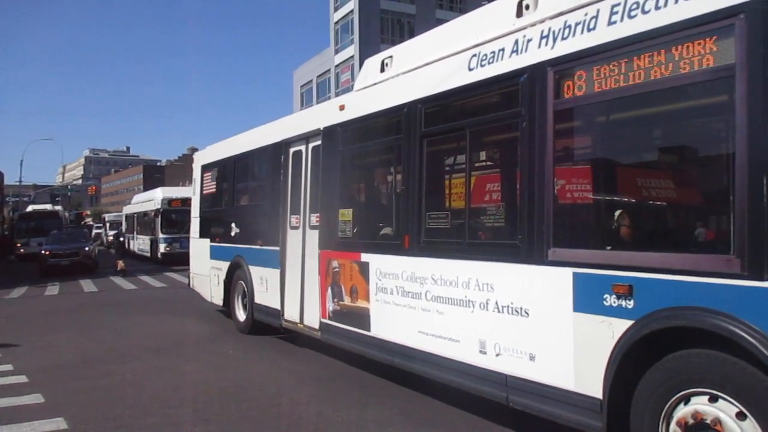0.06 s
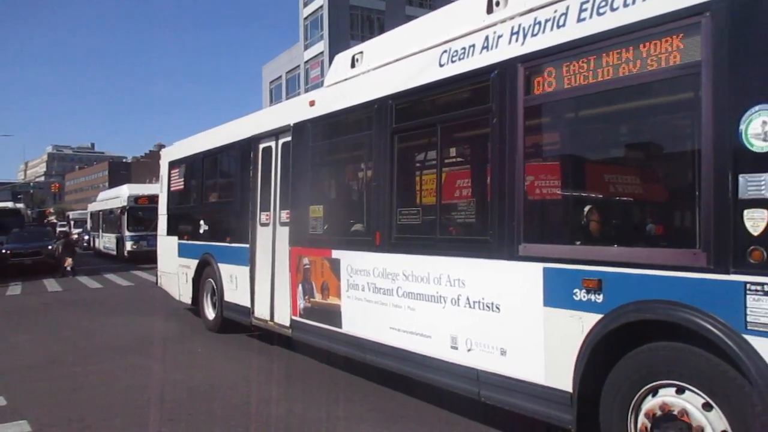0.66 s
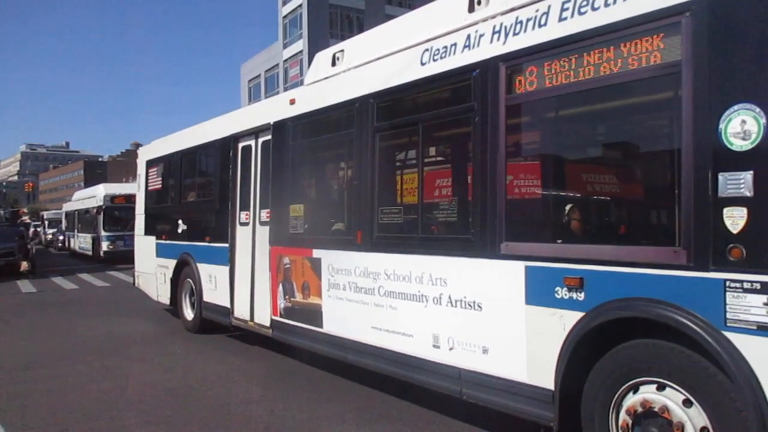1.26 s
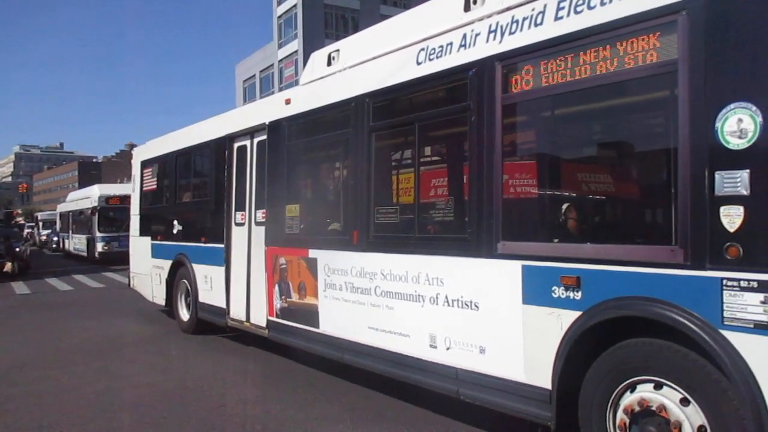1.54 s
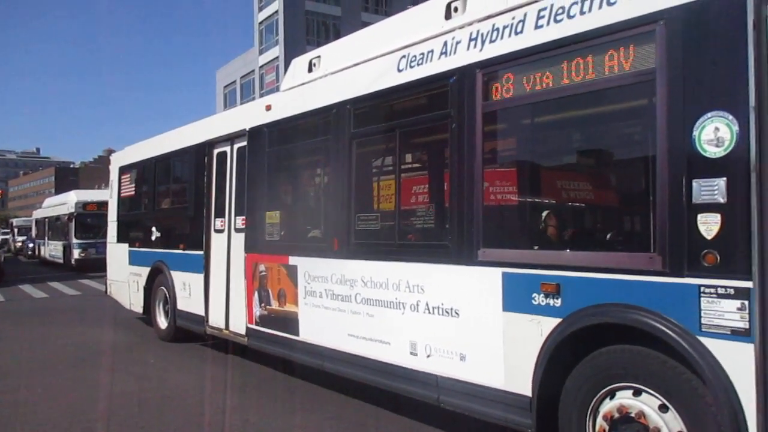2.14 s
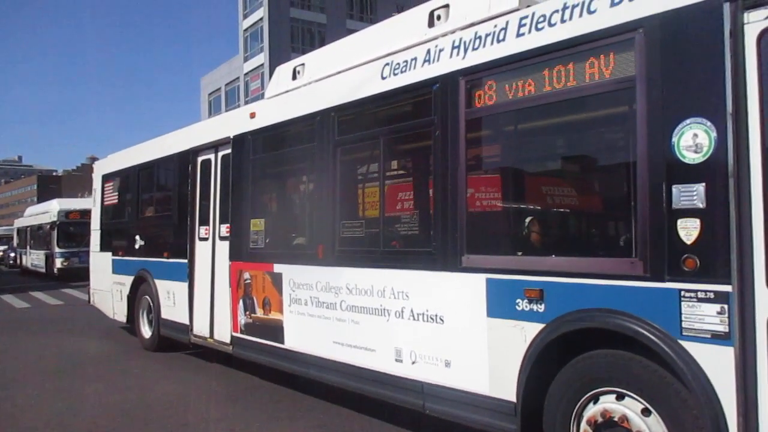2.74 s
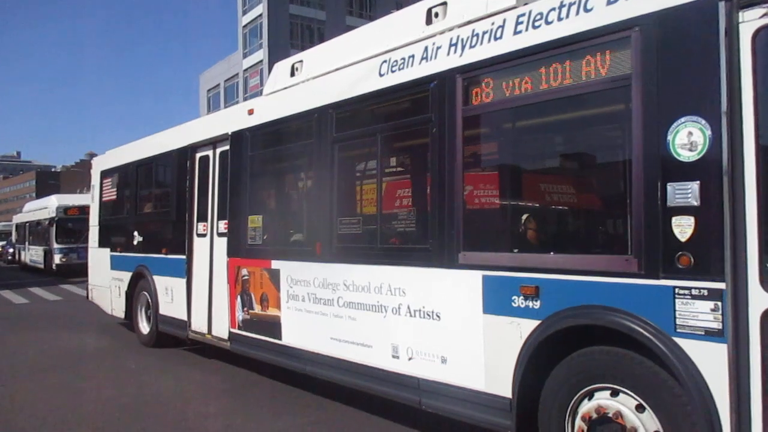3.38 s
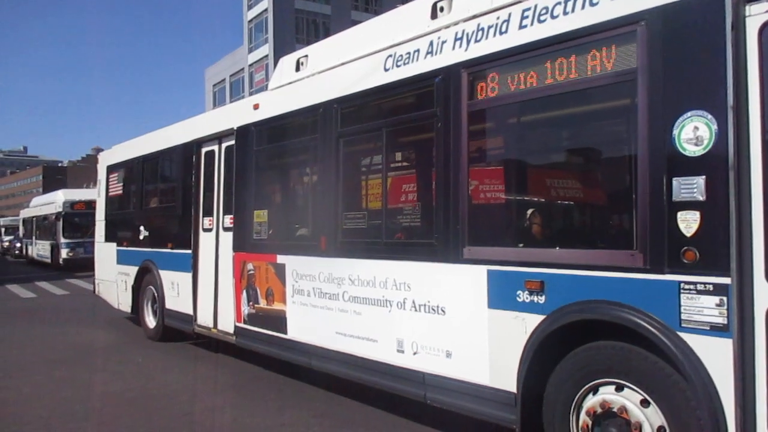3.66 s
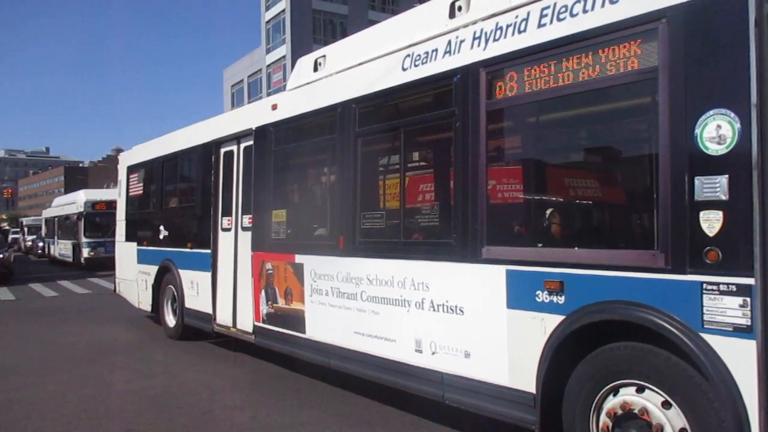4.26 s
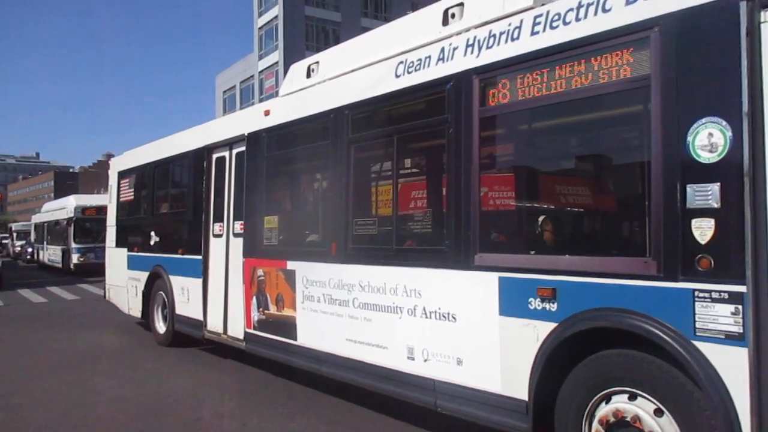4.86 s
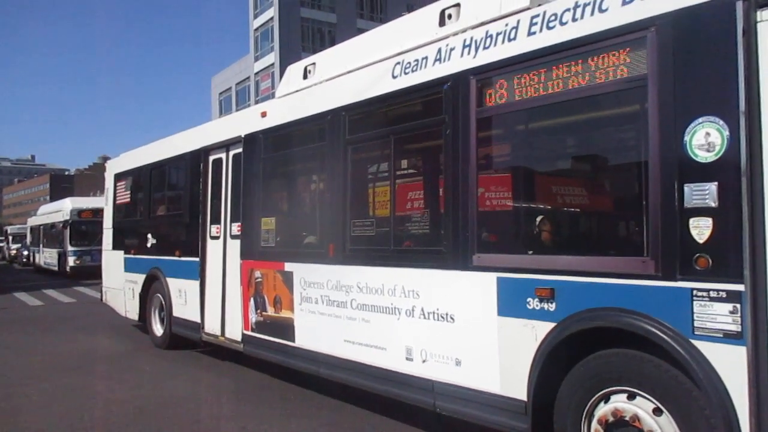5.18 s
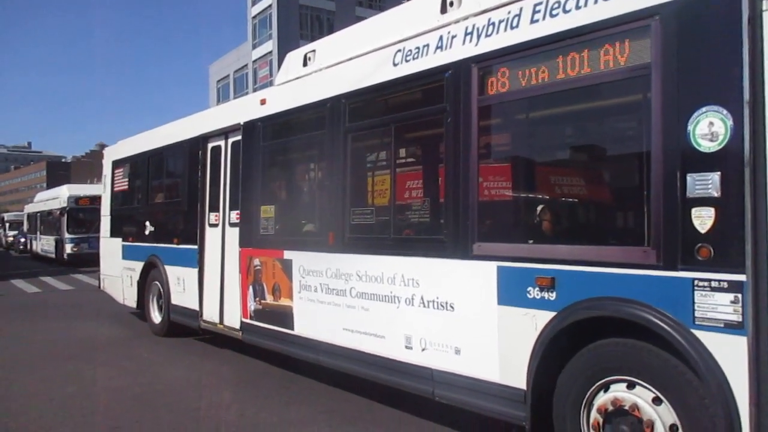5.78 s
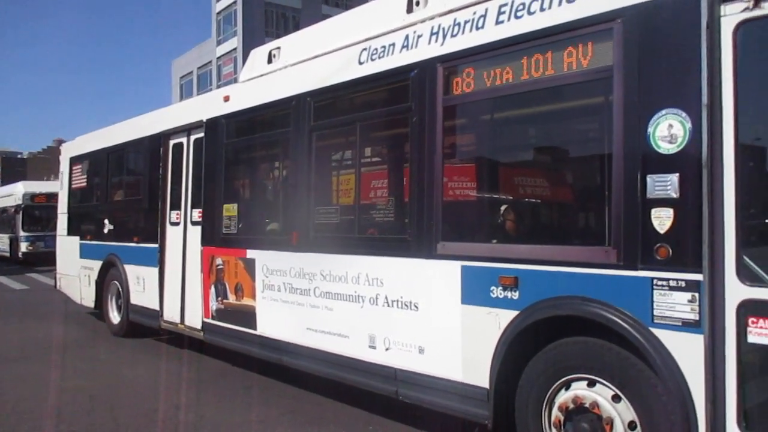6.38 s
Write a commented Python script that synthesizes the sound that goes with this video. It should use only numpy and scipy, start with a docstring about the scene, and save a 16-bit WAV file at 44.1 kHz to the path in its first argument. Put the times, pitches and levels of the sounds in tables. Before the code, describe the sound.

A hybrid city bus idles very close by in street traffic. Its diesel engine gives a low, slightly wavering drone with light clatter for the whole six and a half seconds, blended with a steady rush of fans and street noise. A short squeak opens the sound, and dull body thumps land at about 0.2 and 1 second. A few tiny ticks are scattered throughout. From about 1.5 seconds the brakes give thin, very high squeals on and off, clearest between 2.3 and 3 seconds. A faint, high electric whine swells just after 2 seconds and again near 3.5. A third dull thump comes at 4.2 seconds, followed by a few brief squeaks up to about 4.8. From 5.1 seconds the longest thin squeal flutters almost to the end, with one more squeak near 5.9, while the engine keeps droning.

```python
"""A diesel-electric city bus at arm's length in street traffic.
Throughout, its six-cylinder engine idles near 1000 rpm, droning and clattering under fan and street noise.
It opens with a squeak and two dull body thumps; sparse ticks follow. From 1.5 s the brakes squeal thinly,
on and off, and the inverter whine swells after 2 s and again near 3.5 s. A third thump comes at 4.2 s,
then a few squeaks and, from 5.1 s, the longest squeal."""
import sys
import numpy as np
from scipy import signal
from scipy.fft import rfft, irfft
from scipy.io import wavfile

SR = 44100
rng = np.random.default_rng(int(sys.argv[2]) if len(sys.argv) > 2 else 0)


def wrap_up_sound(samples):
    """Save the sound to the file named by the first command line argument, as 16-bit audio."""
    columns = np.atleast_2d(samples).T
    # keep every value between -1 and 1, then stretch to whole-number steps
    tamed = np.clip(columns, -1, 1)
    steps = np.round(tamed * 32767).astype(np.int16)
    wavfile.write(sys.argv[1], SR, steps)


N = 287857
CYLINDERS = 6

# Street and fan noise. Each row: time in seconds, then rumble, roar and hiss in relative dB.
NOISE_LEVELS = [(0.0, -16, -25, -54), (0.05, -17.5, -24, -52.5), (0.22, -15.5, -23, -48),
                (0.29, -21, -24.5, -54), (0.31, -17, -26.5, -49), (0.43, -19.5, -25.5, -51.5),
                (0.5, -16.5, -26, -52), (0.58, -16.5, -25.5, -54.5), (0.65, -15.5, -25.5, -54),
                (0.94, -18, -24, -52.5), (0.96, -13, -25, -53), (1.01, -15.5, -26, -57),
                (1.08, -14.5, -27, -52), (1.14, -17.5, -25.5, -54.5), (1.26, -14, -25.5, -52.5),
                (1.3, -16.5, -26, -54), (1.37, -14.5, -24.5, -54), (1.43, -20, -26, -53),
                (1.44, -17, -24.5, -53), (1.55, -15, -26, -53), (1.86, -19.5, -25, -51.5),
                (1.93, -15, -23, -51), (1.99, -21, -24, -51), (2.04, -13, -24, -51), (2.07, -11, -23, -50),
                (2.2, -18, -25, -50.5), (2.24, -15, -23, -49), (2.27, -11.5, -27, -52),
                (2.29, -26, -25.5, -48), (2.31, -16, -25, -51), (2.35, -20, -24.5, -53),
                (2.4, -13.5, -25, -48.5), (2.44, -21, -24.5, -49.5), (2.56, -13.5, -24.5, -54),
                (2.63, -19, -24, -53), (2.72, -16, -26, -54), (2.76, -17, -26, -53),
                (3.32, -14.5, -23.5, -53), (3.34, -9.5, -21.5, -55), (3.37, -17, -24, -52),
                (3.54, -16.5, -25.5, -54), (3.57, -16, -21.5, -54), (3.64, -14.5, -25.5, -52),
                (3.74, -14, -23.5, -53), (4.06, -15.5, -24, -51), (4.13, -14.5, -26.5, -54),
                (4.2, -16, -24.5, -47.5), (4.24, -14.5, -25.5, -54), (4.28, -19.5, -27.5, -54),
                (4.49, -18, -28, -57), (4.51, -21, -26.5, -48.5), (4.6, -19, -27, -56),
                (5.61, -16, -22.5, -53), (5.68, -14.5, -22, -50), (5.7, -19, -25, -54.5),
                (5.94, -14, -24, -53), (6.12, -18, -26, -56.5), (6.19, -14, -26, -55),
                (6.3, -19, -26, -54.5), (6.37, -13, -26, -52), (6.39, -15, -25, -55),
                (6.48, -16, -24.5, -52.5)]
# Body boom and valve gear rasp. Each row: time in seconds, then boom and rasp in relative dB.
BOOM_RASP_LEVELS = [(0, -24, -41), (.6, -26.5, -43.5), (1.3, -20.5, -45), (1.75, -24, -44.5),
                    (2.05, -28.5, -38), (2.4, -30, -44.5), (3.0, -29.5, -44), (3.7, -26.5, -45),
                    (4.2, -28, -44), (4.35, -35, -48), (5.0, -28.5, -48), (5.5, -22.5, -48),
                    (6.0, -29, -49), (6.53, -37, -49)]


def from_db(db):
    """Decibels to gain."""
    return 10 ** (np.asarray(db) / 20)


def unit_rms(x):
    """Scale to unit rms."""
    return x / np.sqrt(np.mean(x ** 2) + 1e-20)


def seconds():
    """Time of every sample."""
    return np.arange(N) / SR


def curves(rows):
    """Each column after the time, interpolated to every sample."""
    time_s, *columns = np.transpose(rows)
    return [np.interp(seconds(), time_s, column) for column in columns]


def drift(rate_hz):
    """Unit-rms random wander, mostly below rate_hz."""
    hz = np.arange(N // 2 + 1) * SR / N
    return unit_rms(irfft(rfft(rng.standard_normal(N)) / (1 + (hz / rate_hz) ** 2), N))


def shaped_noise(spectrum):
    """Unit-rms noise with the given spectrum, rolling off beyond its ends."""
    hz = np.maximum(np.arange(N // 2 + 1) * SR / N, 1)
    points_hz, db = np.transpose(spectrum)
    skirts = np.minimum(hz / points_hz[0], 1) * np.minimum(points_hz[-1] / hz, 1)
    gain = from_db(np.interp(np.log(hz), np.log(points_hz), db)) * skirts ** 2
    return unit_rms(irfft(rfft(rng.standard_normal(N)) * gain, N))


def resonate(x, hz, width_hz):
    """Steep-sided resonance."""
    edges_hz = np.clip([hz - width_hz / 2, hz + width_hz / 2], 10, SR / 2 - 10)
    return signal.sosfilt(signal.butter(2, edges_hz, "band", fs=SR, output="sos"), x)


def band_noise(hz, width_hz, drive=1):
    """Unit-rms resonance fed by noise with the envelope drive."""
    return unit_rms(resonate(drive * rng.standard_normal(N), hz, width_hz))


def tone(turns, waver, rate_hz=2.76):
    """Unit-rms sine wavering in amplitude and phase."""
    angle = 2 * np.pi * turns
    in_phase = (1 + waver * drift(rate_hz)) * np.sin(angle)
    quadrature = waver * drift(rate_hz) * np.cos(angle)
    return unit_rms(in_phase + quadrature)


def street_noise():
    """Rush of street and fans: low rumble, flickering roar and hiss."""
    # Spectra. Each row: frequency in Hz, relative density in dB.
    rumble_spectrum = [(10, -32), (26, -13), (33, -18), (42, -9), (55, -0.5), (80, -3.5), (110, 3),
                       (135, -5.5), (170, -3), (220, -4), (280, -7), (330, -7), (480, -21), (900, -41)]
    roar_spectrum = [(200, -6.5), (400, 1.5), (520, -1), (700, -3), (900, -4), (1080, -6.5), (1400, -8),
                     (1660, -10.5), (1760, -14), (2050, -14.5), (2330, -17.5), (2900, -19), (3600, -26),
                     (7000, -47.5)]
    hiss_spectrum = [(2000, -4), (3800, 2.5), (4600, 1.5), (5500, 0.5), (6500, -3), (7900, -5),
                     (8500, -8.5), (9800, -9), (11000, -13.5), (13000, -16.5), (15500, -27)]
    rumble_db, roar_db, hiss_db = curves(NOISE_LEVELS)
    rumble = from_db(rumble_db - 4.0) * shaped_noise(rumble_spectrum)
    roar = from_db(roar_db - 0.8 + 0.5 * drift(34)) * shaped_noise(roar_spectrum)
    hiss = from_db(hiss_db + 4.5 + drift(40)) * shaped_noise(hiss_spectrum)
    return rumble + roar + hiss


def body_boom():
    """One low resonance of the bus body."""
    boom_db, _ = curves(BOOM_RASP_LEVELS)
    return from_db(boom_db) * band_noise(hz=161.2, width_hz=29.3)


def body_ticks(decay_s=0.0015):
    """Tiny bright snaps of decaying noise."""
    # Each row: start in seconds, peak in dB, band centre in Hz.
    ticks = [(.780, -43, 7800), (1.418, -33, 8000), (2.293, -29, 6800), (3.998, -32, 8500),
             (4.867, -31, 5800), (6.503, -23, 4340)]
    out = np.zeros(N)
    for start_s, db, hz in ticks:
        age_s = np.maximum(seconds() - start_s, 0)
        envelope = (age_s > 0) * np.exp(-age_s / decay_s) + 1e-12
        snap = band_noise(hz, width_hz=hz / 2, drive=envelope)
        out += from_db(db) * snap / np.abs(snap).max()
    return out


def body_thumps(width_s=0.0012):
    """Each is one short push of pressure with shallow suction on either side."""
    # Each row: centre in seconds, peak in dB.
    thumps = [(0.248, -4), (.964, -9), (4.242, -2.5)]
    out = np.zeros(N)
    for centre_s, db in thumps:
        offset = (seconds() - centre_s) / width_s
        out += from_db(db) * (1 - offset ** 2) * np.exp(-offset ** 2 / 2)
    return out


def inverter_whine(hz=9942):
    """The drive electronics hold one high, wavering tone."""
    # Each row: time in seconds, relative level in dB.
    levels = [(0.0, -71), (0.45, -82), (0.52, -80), (1.33, -72), (1.42, -70), (1.82, -74), (2.09, -59),
              (2.27, -63), (2.47, -67), (2.6, -65), (2.84, -72), (3.33, -71), (3.49, -63), (3.87, -62),
              (4.13, -73), (4.18, -71), (4.33, -76), (4.47, -77), (5.02, -85), (5.07, -74), (6.0, -73),
              (6.11, -77), (6.53, -72)]
    level_db, = curves(levels)
    return from_db(level_db + 1.5) * tone(hz * seconds(), waver=0.5, rate_hz=9)


def brake_squeals(ramp_s=0.006, jitter_hz=14):
    """Pads sing on one mode per squeal, fluttering as they grip and slip."""
    # One table per squeal. Each row: time in seconds, pitch in Hz, relative level in dB.
    lower_mode = [
        [(2.28, 11585, -60), (2.452, 11577, -48), (2.512, 11603, -55), (2.524, 11599, -46), (2.612, 11622, -52),
         (2.628, 11615, -43), (2.688, 11629, -71), (2.708, 11653, -51), (2.75, 11662, -66)],
        [(2.79, 12369, -69), (2.866, 12351, -50), (2.874, 12334, -56), (2.988, 12357, -48), (3.02, 12353, -69),
         (3.136, 12371, -67), (3.148, 12381, -61), (3.17, 12391, -66)],
        [(5.1, 12366, -60), (5.202, 12424, -64), (5.232, 12349, -40), (5.258, 12361, -54), (5.292, 12346, -43),
         (5.318, 12376, -57), (5.482, 12386, -52), (5.63, 12398, -77), (5.652, 12369, -38), (5.778, 12360, -70),
         (5.792, 12425, -53), (5.86, 12396, -70), (5.884, 12366, -40), (5.91, 12368, -52), (6.08, 12345, -49),
         (6.144, 12381, -67), (6.16, 12364, -53), (6.342, 12392, -73), (6.422, 12442, -59), (6.46, 12426, -75)],
    ]
    upper_mode = [
        [(1.54, 15172, -77), (1.594, 15151, -66), (1.616, 15117, -66), (1.71, 15146, -59), (1.78, 15225, -74),
         (1.82, 15199, -74)],
        [(2.79, 14844, -77), (2.798, 14670, -67), (2.838, 14608, -71), (2.856, 14678, -62), (3.02, 14747, -75)],
    ]
    t = seconds()
    out = np.zeros(N)
    for rows in [*lower_mode, *upper_mode]:
        hz, db = curves(rows)
        start_s, end_s = rows[0][0], rows[-1][0]
        gate = np.clip(np.minimum(t - start_s, end_s - t) / ramp_s, 0, 1)
        turns = np.cumsum(hz + jitter_hz * drift(40)) / SR
        out += gate * from_db(db + 0.5) * tone(turns, waver=0.51, rate_hz=45)
    return out


def brake_squeaks(attack_s=0.0033):
    """Brief slips catch on one pitch and fade."""
    # Each row: start in seconds, pitch in Hz, length in seconds, relative level in dB.
    slips = [(0, 3241, .12, -37), (.13, 3241, 0.25, -44), (1.10, 12120, .06, -66), (1.29, 12120, .06, -64),
             (1.44, 15450, .1, -71), (1.48, 12100, .07, -60), (1.72, 12080, .05, -57),
             (3.315, 6730, .08, -50), (4.33, 3700, 0.01, -34), (4.737, 2630, .045, -35.5),
             (4.775, 2640, 0.055, -42), (5.865, 2650, 0.062, -33.5)]
    pitch_ratio = 1 + 0.0052 * drift(81)
    out = np.zeros(N)
    for start_s, hz, length_s, db in slips:
        age_s = seconds() - start_s
        envelope = np.clip(age_s / attack_s, 0, 1) * np.clip(1 - age_s / length_s, 0, 1)
        turns = np.cumsum(hz * pitch_ratio) / SR
        out += from_db(db) * envelope * np.sqrt(2) * np.sin(2 * np.pi * turns)
    return out


def fan_tone(cycles, blades_per_cycle=18.12):
    """Blade tone of the cooling fan, geared to the crank."""
    # Each row: time in seconds, relative level in dB.
    levels = [(0.0, -17.5), (0.14, -23), (0.38, -39), (0.49, -19), (0.71, -22.5), (0.95, -27.5),
              (1.07, -21.5), (1.96, -24.5), (2.05, -37), (2.42, -15), (2.98, -23.5), (3.38, -11.5),
              (3.56, -24.5), (4.16, -23.5), (4.4, -30), (4.74, -24.5), (5.07, -44), (5.33, -31),
              (5.45, -36), (5.6, -35), (5.89, -28), (6.07, -31), (6.53, -35)]
    level_db, = curves(levels)
    return from_db(level_db - 2.0) * tone(blades_per_cycle * cycles, waver=0.31)


def valve_gear(cycles, firing_hz, attack_s=0.00036):
    """The gear train rasps steadily; knocks recur at set places in each engine cycle."""
    # Each row: place in the cycle 0-1, centre in Hz, width in Hz, decay in seconds, relative level in dB.
    knocks = [(1, 2800, 240, 0.0052, 5), (.91, 5130, 370, 0.021, -6), (.07, 2790, 170, 0.021, 3),
              (0.6, 2730, 280, 0.011, -6), (.90, 7400, 1400, .02, -11), (0.04, 950, 850, 0.0053, 15)]
    _, rasp_db = curves(BOOM_RASP_LEVELS)
    out = from_db(-5.0) * band_noise(hz=2786, width_hz=230)
    for place, hz, width_hz, decay_s, db in knocks:
        age_s = (cycles - place) % 1 * CYLINDERS / firing_hz
        envelope = np.exp(-age_s / decay_s) * (1 - np.exp(-age_s / attack_s))
        out += from_db(db + 1.5 * drift(6)) * envelope * band_noise(hz, width_hz)
    return out * from_db(rasp_db)


def block_hum(cycles):
    """Block and belt-driven parts hum at engine orders, swelling with the rumble."""
    # Each row: multiple of the cycle rate, relative level in dB.
    orders = [(4, -42), (5, -26.5), (7, -34.5), (8, -30.5), (9, -33), (10, -33), (10.45, -27), (12.6, -26),
              (13, -34), (15, -32.5), (16, -29.5), (20, -29), (21, -30), (24.4, -34), (28, -40), (30, -36),
              (32, -36.5), (38, -34.5), (47, -40), (50, -46)]
    rumble_db, _, _ = curves(NOISE_LEVELS)
    hum = sum(from_db(db) * tone(order * cycles + rng.random(), waver=0.49) for order, db in orders)
    return hum * from_db(rumble_db - rumble_db.mean() - 1.0)


def diesel_clatter(cycles):
    """Each firing puffs noise into the engine bay resonances; the level follows the roar."""
    # Each row: centre in Hz, width in Hz, relative level in dB.
    bay_modes = [(371, 76, -38), (792.7, 49, -36), (861.6, 34, -39.5), (975, 45, -41.5), (1145, 66, -41.5),
                 (1246, 52, -44), (1516, 48, -42.5), (1642, 51, -42.5), (2630, 170, -51), (2987, 22, -60),
                 (3214, 43, -55.5), (4200, 410, -55), (5070, 350, -58.5), (9540, 35, -78)]
    _, roar_db, _ = curves(NOISE_LEVELS)
    firings = np.cos(2 * np.pi * CYLINDERS * cycles)
    imbalance = np.cos(2 * np.pi * (cycles - 0.15))  # some cylinders fire harder
    puffs = 1 + 0.37 * (firings + imbalance)
    ringing = sum(from_db(db) * band_noise(hz, width_hz, drive=puffs) for hz, width_hz, db in bay_modes)
    return ringing * from_db(0.98 * (roar_db - roar_db.mean()) - 1.84)


def exhaust_drone(cycles):
    """Exhaust note at the firing rate."""
    # Each row: time in seconds, relative level in dB.
    levels = [(0.0, -23), (0.13, -17), (0.22, -12.5), (0.45, -24), (0.51, -19), (0.67, -19), (0.74, -26),
              (0.8, -24), (0.91, -16), (0.98, -33), (1.03, -17), (1.16, -19), (1.23, -26), (1.33, -20),
              (1.38, -32), (1.58, -27), (1.67, -40), (1.74, -16), (1.84, -28), (1.89, -9), (1.93, -12),
              (2.09, -25), (2.27, -18), (2.34, -24), (2.42, -13.5), (2.51, -16.5), (2.73, -17), (2.95, -24),
              (2.98, -15), (3.14, -28), (3.22, -36), (3.27, -16), (3.38, -31), (3.49, -11), (3.56, -19),
              (3.82, -28), (3.89, -15), (3.96, -24), (4.07, -11), (4.2, -28), (4.27, -19), (4.33, -34),
              (4.38, -23), (4.56, -23), (4.6, -19.5), (5.07, -23), (5.14, -12.5), (5.34, -19), (5.73, -13),
              (5.8, -24), (5.95, -18.5), (6.2, -33), (6.27, -20), (6.36, -36), (6.45, -21), (6.53, -17)]
    level_db, = curves(levels)
    return from_db(level_db - 0.5) * tone(CYLINDERS * cycles, waver=0.06)


def scene():
    """Engine, street, inverter, brakes and body, summed in mono."""
    # Engine speed. Each row: time in seconds, firing rate in Hz.
    firing_rates = [(0.0, 50.32), (0.59, 50.74), (1.19, 47.93), (1.78, 48.5), (2.37, 49.58), (2.97, 50.17),
                    (3.56, 50.99), (4.16, 47.77), (4.75, 48.55), (5.34, 49.97), (5.94, 49.92),
                    (6.53, 50.05)]
    firing_hz, = curves(firing_rates)
    cycles = 0.378 + np.cumsum(firing_hz) / CYLINDERS / SR  # two crank turns per cycle
    engine = exhaust_drone(cycles) + fan_tone(cycles) + block_hum(cycles)
    engine += diesel_clatter(cycles) + valve_gear(cycles, firing_hz)
    background = body_boom() + street_noise() + inverter_whine()
    brakes = brake_squeals() + brake_squeaks()
    return (engine + background + brakes + body_ticks() + body_thumps())[None]


def gain_control(x, limit_db=-0.5, recovery_db_per_s=4.5, attack_s=0.0015):
    """Peaks over the limit pull the gain down fast; it recovers at a steady rate."""
    over_db = np.maximum(20 * np.log10(np.abs(x) + 1e-9) - limit_db, 0)
    recovery_db = recovery_db_per_s * seconds()
    cut_db = np.maximum.accumulate(over_db + recovery_db, axis=-1) - recovery_db
    pole = np.exp(-1 / (attack_s * SR))
    return x * from_db(-signal.lfilter([1 - pole], [1, -pole], cut_db))


def record(dry):
    """Gain control, soft clip, steep low-pass."""
    cutoff_hz = 15720
    held = gain_control(dry)
    rounded = held / (1 + held ** 8) ** (1 / 8)
    lowpass = signal.ellip(12, 0.1, 90, cutoff_hz, fs=SR, output="sos")
    return signal.sosfilt(lowpass, rounded)


dry = scene()
out = record(dry)
wrap_up_sound(out)
```